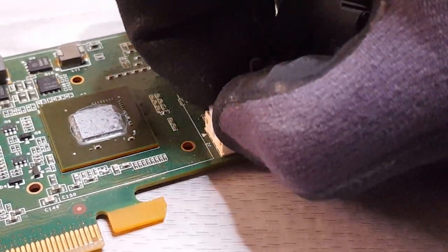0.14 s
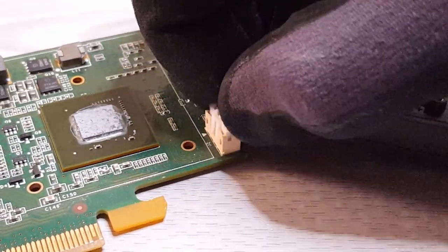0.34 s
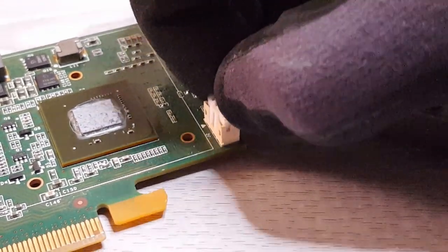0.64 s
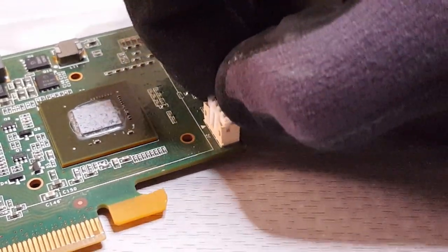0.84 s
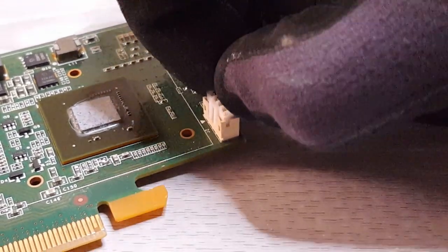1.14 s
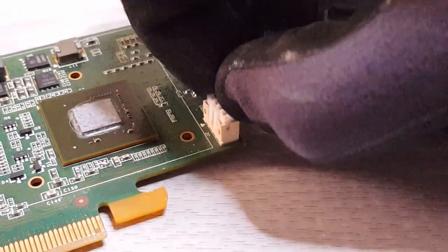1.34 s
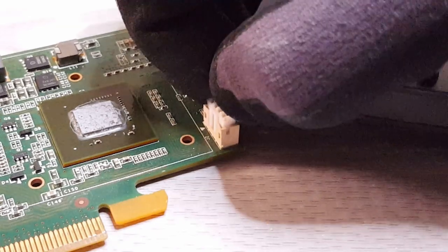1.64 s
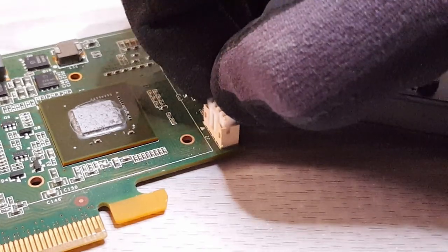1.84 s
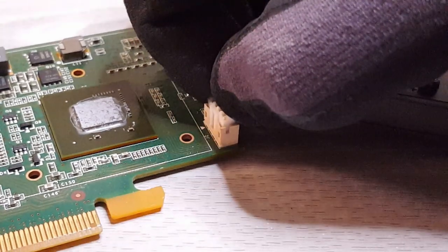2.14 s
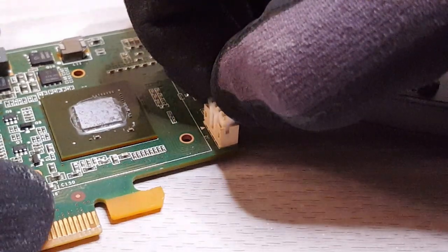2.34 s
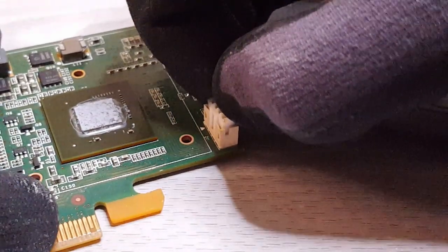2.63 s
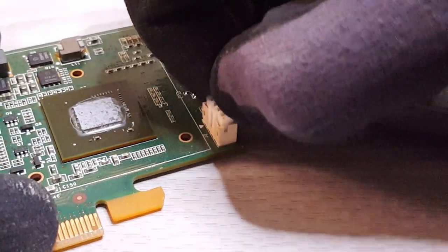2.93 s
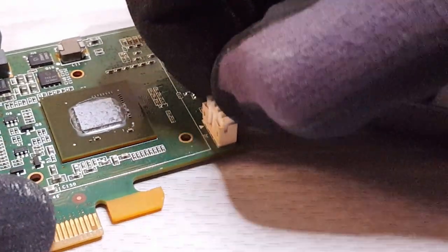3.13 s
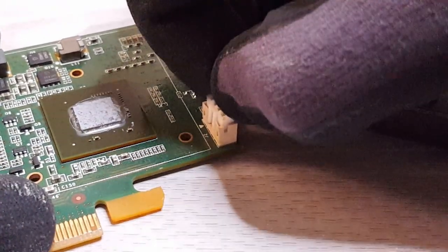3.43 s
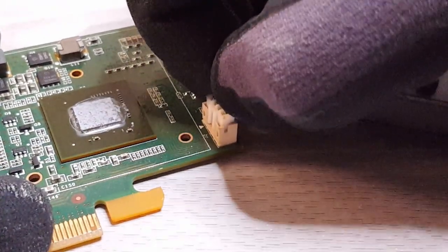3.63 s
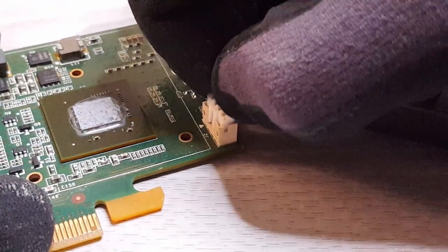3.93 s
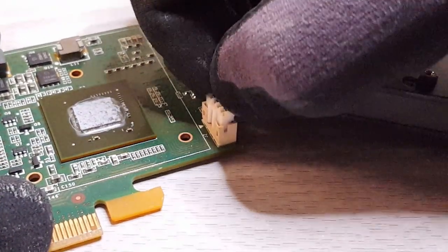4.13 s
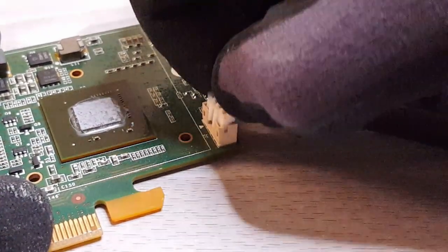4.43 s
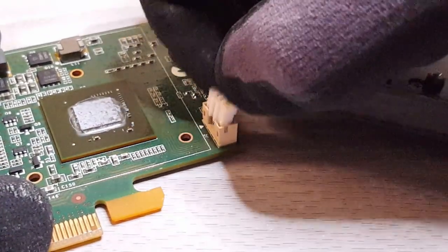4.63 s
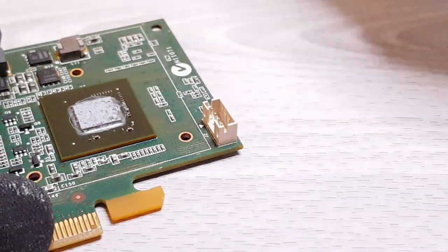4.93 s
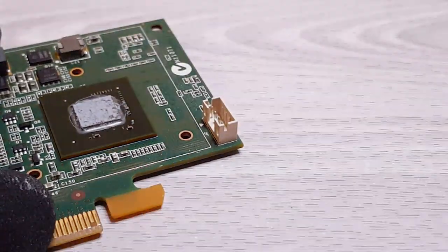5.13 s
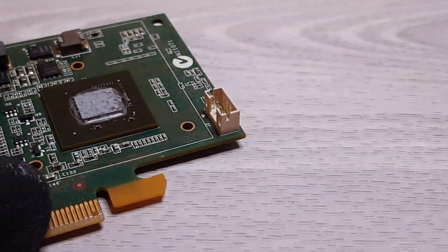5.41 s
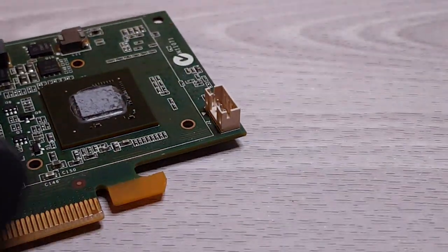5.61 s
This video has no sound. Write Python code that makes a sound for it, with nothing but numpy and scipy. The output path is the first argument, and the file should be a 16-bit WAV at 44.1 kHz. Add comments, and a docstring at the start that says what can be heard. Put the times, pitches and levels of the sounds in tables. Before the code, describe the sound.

In a small quiet room, close stereo microphones catch gloved fingers working a tight plug on a circuit card: uneven hard plastic clicks, light ticks, dull taps and gritty rubbing with faint high metallic singing. Near the end the freed cooler skips, scrapes briefly across the wooden table and lands with a small hollow knock.

```python
"""Freeing a cooler from a graphics card

In a small quiet room, gloved fingers rock a fan plug out of a card lying on a wooden table.
The stereo microphones hear plug clicks as damped modes and noise bursts, and rubbing as clumpy noise
through resonances of the plastic housing and the singing metal fins.
The freed cooler is dragged away as pressure-driven friction and lands on ringing table modes."""
import sys
import numpy as np
from scipy import signal
from scipy.fft import rfft, irfft, next_fast_len
from scipy.io import wavfile
from scipy.ndimage import map_coordinates

SR = 44100
rng = np.random.default_rng(int(sys.argv[2]) if len(sys.argv) > 2 else 0)


def output_pcm(signal):
    """Save a mono or channel-first signal as 16-bit PCM at the path in sys.argv[1].

    Samples are clipped to [-1, 1] before scaling.
    """
    pcm = np.clip(np.atleast_2d(signal).T, -1, 1) * 32767
    wavfile.write(sys.argv[1], SR, np.round(pcm).astype(np.int16))


N = 254456  # samples


def amp(db):
    """Decibels to gain."""
    return 10 ** (np.asarray(db) / 20)


def unit(x):
    """Scale to rms 1."""
    return x / np.sqrt(np.mean(x ** 2) + 1e-20)


def along(points, hz):
    """Interpolate (frequency, value) points on a logarithmic frequency axis."""
    f, value = np.transpose(points)
    return np.interp(np.log(hz + 1), np.log(f + 1), value)


def fade(t, t60):
    """Exponential decay by 60 dB in t60 seconds."""
    return np.exp(-np.log(1000) * t / t60)


def swell(s, half):
    """A bell-shaped stroke centred on s."""
    return np.exp(-((np.arange(N) / SR - s) / half) ** 2 / 2)


def wobble(rate):
    """A smooth random curve with rate knots a second."""
    knots = rng.standard_normal(int(N * rate / SR) + 4)
    return map_coordinates(knots, [np.arange(N) * rate / SR])


def level_curve(rows):
    """Gain per sample from (time, level) rows; practically silent outside them."""
    s, db = np.transpose(rows)
    return amp(np.interp(np.arange(N) / SR, s, db, left=-120, right=-120))


def filtered(x, response):
    """x times a response of frequency, zero-padded against wrap-around."""
    n = x.shape[-1]
    m = next_fast_len(n + SR // 4)
    hz = np.fft.rfftfreq(m, 1 / SR)
    return irfft(rfft(x, m) * response(hz), m)[..., :n]


def coloured(x, spectrum):
    """x weighted by the given spectrum, at rms 1."""
    return unit(filtered(x, lambda hz: amp(along(spectrum, hz))))


def resonate(x, peaks):
    """x through a set of steep-sided resonances added together."""
    def response(f):
        return sum(amp(db) * (f * width) ** 2 / ((centre ** 2 - f ** 2) ** 2 + (f * width) ** 2)
                   for centre, width, db in peaks)
    return filtered(x, response)


# likeness of noise at the left and right microphones: (frequency [Hz], correlation [0-1])
LIKENESS = [(60, 0.87), (290, 0.7), (640, 0.4), (1400, 0.014), (15000, 0.021)]


def noise(size):
    """White noise at two microphones, alike in the bass and nearly unrelated in the treble."""
    def mid_side_gains(hz):
        angle = np.arccos(np.clip(along(LIKENESS, hz), -1, 1)) / 2
        return np.array([np.cos(angle), np.sin(angle)])
    mid, side = filtered(rng.standard_normal((2, size)), mid_side_gains)
    return np.array([mid + side, mid - side])


def friction(rough_db, rate):
    """Tiny slips: noise whose level clumps at random, rate knots a second."""
    return noise(N) * amp(rough_db * wobble(rate))


def burst(spectrum, t, t60):
    """A dense cluster of quickly damped vibrations, as decaying coloured noise."""
    return coloured(noise(len(t)), spectrum) * fade(t, t60)


# uneven radiation towards the two microphones: (frequency [Hz], lead of the left [rad])
LEFT_LEAD = [(150, 0.5), (500, 0), (1200, 1.6), (1880, 1.5), (2220, -0.5), (2730, -4), (3000, -5),
             (3450, -11.5), (4400, -18), (11000, -6)]


def ring(modes, t, scatter_db, detune):
    """One blow on damped modes of alternating sign, as the two microphones hear it."""
    hz, db, t60 = np.transpose(modes)[..., None]
    size, shift = rng.standard_normal((2, len(modes), 1))
    sign = (-1) ** np.arange(len(modes))[:, None]
    lead = along(LEFT_LEAD, hz) / 2
    phase = 2 * np.pi * hz * (1 + detune * shift) * t
    waves = sign * np.sin(phase + np.array([lead, -lead]))
    blow = np.sum(amp(db + scatter_db * size) * fade(t, t60) * waves, axis=1)
    return blow * (1 - np.exp(-t / .0002))  # soften the onset


def sing(peaks, wander_db, count=4):
    """Rubbed fins: as the contact moves, groups of modes swell and sink on their own."""
    drive = friction(rough_db=3.0, rate=270)
    groups = 0
    for k in range(count):
        wander = amp(wander_db * np.tanh(wobble(20)))
        groups = groups + wander * resonate(drive, peaks[k::count])
    return unit(groups)


def panned(x, pan_db):
    """Set the left-right level difference; positive leans left."""
    return x * amp([[pan_db / 2], [-pan_db / 2]])


def add(track, s, x):
    """Mix x into the track at time s."""
    part = track[:, round(s * SR):][:, :x.shape[1]]
    part += x[:, :part.shape[1]]


# decay of the small room: (frequency [Hz], time to fall 60 dB [s])
ROOM_DECAY = [(120, 0.81), (500, 0.51), (2500, 0.27), (6000, 0.21), (14000, 0.18)]


def in_room(x, wet_db):
    """x with quick reflections from table and hands, and the room's short tail."""
    size = SR // 3
    t = np.arange(size) / SR
    hz, frames, z = signal.stft(noise(size), SR, nperseg=256)
    decaying = z * fade(frames, along(ROOM_DECAY, hz)[:, None])
    tail = signal.istft(decaying, SR, nperseg=256)[1][:, :size]
    tail = tail * (1 - np.exp(-t / 0.0014))
    near = noise(size) * fade(t, 0.034) * (t > .0007)
    answer = 1.22 * near / np.linalg.norm(near[0]) + tail / np.linalg.norm(tail[0])
    return x + amp(wet_db) * signal.fftconvolve(x, answer, axes=1)[:, :x.shape[1]]


# hush of the small room: (frequency [Hz], spectral level [dB])
ROOM_HUSH = [(12, -47.5), (20, 3.5), (154, -5), (513, -15.5), (574, -15.5), (660, -15), (949, -19),
             (1480, -17), (2020, -20.5), (2260, -20.5), (2670, -22.5), (3950, -26), (5530, -29),
             (6540, -31), (16000, -31)]


def room_tone():
    """Low rumble and thin hiss: coloured noise at a slightly unsteady level."""
    return amp(-62.5 + 0.13 * wobble(7.6)) * coloured(noise(N), ROOM_HUSH)


# a glove brushing past the card: (centre time [s], half length [s], level [dB])
GLOVE_STROKES = [(2.103, 0.093, -59), (2.357, 0.026, -64.5)]
# knit fabric: (frequency [Hz], spectral level [dB])
FABRIC = [(59, -29), (100, -5), (312, -11.5), (360, -3), (713, -17.5), (774, -14), (1960, -18), (3090, -12),
          (4050, -23.5), (4880, -22.5), (9000, -26), (14000, -30)]


def brushing():
    """Knit fabric brushes softly past the card as swells of clumpy friction noise."""
    level = sum(amp(db) * swell(s, half) for s, half, db in GLOVE_STROKES)
    return level * coloured(friction(rough_db=2.5, rate=290), FABRIC)


def creaks():
    """Faint stray scuffs of gripped plastic: short noise bursts at random times."""
    out = np.zeros((2, N))
    t = np.arange(SR // 8) / SR
    scuff_spectrum = [(200, 2), (1200, -4), (2500, -11), (6000, -16.0), (16000, -16)]
    for when, strength in rng.random(size=(36, 2)):
        scuff = burst(scuff_spectrum, t, t60=0.026)
        add(out, 4.7 * when, amp(-68.5 + 7 * strength) * in_room(scuff, wet_db=-0.5))
    return out


# plastic fan housing: (mode frequency [Hz], relative level [dB], time to fall 60 dB [s])
HOUSING_MODES = [(1320, -50, 0.038), (1856, -23.5, 0.075), (2168, -13.5, 0.039), (2690, -6, 0.024),
                 (2964, 0, 0.011), (3330, -15.5, 0.025), (4280, -17.5, 0.011), (5250, -50, 0.012),
                 (8670, -37, 0.04), (10700, -44, 0.032)]
# card on the table: (mode frequency [Hz], relative level [dB], time to fall 60 dB [s])
BOARD_MODES = [(63, -15, 0.038), (93, -4.5, 0.2), (149, 0, 0.14), (249.6, -6, 0.088), (320, -6, 0.1),
               (462, -4.5, 0.027)]
# dense vibration of the struck shell: (frequency [Hz], spectral level [dB])
SHELL_BURST = [(500, -8.5), (1800, -22), (2900, 3), (3800, -18), (5500, -8), (7000, -34), (16000, -77)]
# sharp snap of the contact: (frequency [Hz], spectral level [dB])
SNAP_BURST = [(300, -6), (2000, -7), (3000, 2), (5000, 7.5), (6800, -1), (8800, 2.5), (11500, -4),
              (16000, -7)]
# hollow clack of the housing: (frequency [Hz], spectral level [dB])
CLACK_BURST = [(200, -33), (600, -1), (1300, -1), (2100, 2.5), (3500, -10.5), (8000, -21)]


def contact(db, knock_db, clack_db, snap_db, pan_db):
    """One contact snaps, rings the plastic housing and knocks the board against the table."""
    t = np.arange(SR // 5) / SR
    plastic = amp(-9.0) * ring(HOUSING_MODES, t, scatter_db=2.0, detune=0.011)
    shell = amp(-9.0) * burst(SHELL_BURST, t, t60=0.0072)
    snap = amp(snap_db + 6) * burst(SNAP_BURST, t, t60=0.003)
    clack = amp(clack_db) * burst(CLACK_BURST, t, t60=0.041)
    knock = amp(knock_db - 5.5) * ring(BOARD_MODES, t, scatter_db=1.0, detune=0.016)
    blow = panned(plastic + shell + snap, pan_db) + clack + knock
    return amp(db) * in_room(blow, wet_db=-13.5)


def gripping(count=5):
    """A short uneven run of tiny contacts as the fingers take hold."""
    out = np.zeros((2, N))
    start_s, gap_s = .035, .052
    for k, (late, strength) in enumerate(rng.uniform(-0.87, 1, size=(count, 2))):
        tick = contact(-56.5 + 2 * strength, knock_db=0, clack_db=-3.0, snap_db=-6, pan_db=7)
        add(out, abs(start_s + gap_s * (k + .15 * late)), tick)
    return out


# the cooler lands: (time [s], relative thud level [dB], crack level [dB])
LANDING_BLOWS = [(5.617, -30, -30.5), (5.6281, -18.5, -31), (5.6335, -25, -22), (5.637, -22, -27.5),
                 (5.666, -37, -34), (5.6689, -28.5, -32)]
# wooden table top: (mode frequency [Hz], relative level [dB], time to fall 60 dB [s])
TABLE_MODES = [(91.5, -9, 0.14), (150.8, -13.5, 0.41), (231, -5, 0.12), (270, -4, 0.12), (313, -10.5, 0.2),
               (390.4, -8, 0.17), (425, -7, 0.15), (518, 2.5, 0.083), (670, -17.5, 0.062), (765, -8, 0.085),
               (892, -14, .12), (1130, -10.5, 0.12), (1207, -9, 0.13), (1880, -17, 0.12), (2140, -26, 0.16),
               (2163, -11, 0.12), (2530, -10, 0.08)]
# dull thump: (frequency [Hz], spectral level [dB])
THUMP_BURST = [(35, -35), (80, -13), (200, -2), (330, -1.5), (500, 1.5), (850, -6), (1200, -10),
               (1700, -34), (6000, -51)]
# bright crack of the impact: (frequency [Hz], spectral level [dB])
CRACK_BURST = [(200, -6), (900, -1), (3000, 1), (4300, -3.5), (6500, 0), (7800, -7), (11000, -6.5),
               (16000, -18)]


def landing():
    """One corner touches, the cooler falls flat and rocks once; the table modes boom."""
    out = np.zeros((2, N))
    t = np.arange(SR // 3) / SR
    for s, thud_db, crack_db in LANDING_BLOWS:
        boom = amp(thud_db - 9.5) * ring(TABLE_MODES, t, scatter_db=3.5, detune=0.014)
        thump = amp(thud_db - 2) * burst(THUMP_BURST, t, t60=0.029)
        crack = amp(crack_db) * burst(CRACK_BURST, t, t60=0.024)
        add(out, s, in_room(boom + thump + panned(crack, pan_db=-1.5), wet_db=-9.5))
    return out


# level around which fin ring and scrape grow with force [dB]
FIRM_DB = -57.5
# fins singing in a pull: (centre [Hz], width [Hz], relative level [dB])
PULLED_FINS = [(7100, 300, -7), (8380, 150, -11), (9380, 390, -3.5), (9960, 280, -7), (12500, 370, 1),
               (13200, 390, -27)]
# the cooler sliding over the table: (time [s], pressure level [dB])
SLIDE_PRESSURE = [(4.93, -71), (4.94, -50), (4.98, -49), (5.04, -57), (5.08, -45.5), (5.13, -51),
                  (5.235, -66), (5.39, -75), (5.45, -67), (5.52, -82)]
# its edge skipping before the slide: (time [s], level [dB])
EDGE_SKIPS = [(4.877, -49), (4.89, -52), (4.918, -44.5), (4.9382, -46.5)]
# drag over wood: (frequency [Hz], spectral level [dB])
DRAG_SPECTRUM = [(47, -45), (80, -16), (139, 2.5), (182, -9.5), (265, -1), (515, -3), (615, -9.5),
                 (1200, -16.5), (1310, -17), (2130, -10), (5640, -13.5), (7700, -14.5), (11000, -14.5),
                 (13700, -24), (16000, -35)]
# fins singing in the slide: (centre [Hz], width [Hz], relative level [dB])
SLIDING_FINS = [(5360, 1200, -1), (8260, 310, -2), (9340, 650, 1), (10550, 780, -2.5), (11260, 450, -3),
                (13300, 400, 0)]


def sliding():
    """The cooler skips, then is dragged away in two pulls; friction excites its singing fins."""
    pressure = level_curve(SLIDE_PRESSURE)
    skips = sum(amp(db) * swell(s, half=0.0032) for s, db in EDGE_SKIPS)
    catch = amp(0.91 * wobble(70))  # the edge catches and runs free
    drag = (pressure + skips) * coloured(friction(rough_db=2, rate=480), DRAG_SPECTRUM)
    # the fins grow more slowly than the pressure
    fin_level = amp(FIRM_DB - 1.5) * (pressure / amp(FIRM_DB)) ** 0.88
    fins = fin_level * sing(SLIDING_FINS, wander_db=4.0)
    chirps = amp(-2) * skips * sing(PULLED_FINS + SLIDING_FINS, wander_db=-1.0)
    moving = panned(drag, pan_db=-2.5) + panned(fins + chirps, pan_db=-3.0)
    return in_room(catch * moving, wet_db=-11)


# rubbing strokes: (centre time [s], half length [s], force level [dB], share of pull against push [0-1])
RUBS = [(0.368, 0.021, -55.5, 1), (0.473, 0.006, -66.5, 1), (0.618, 0.043, -68.5, 1),
        (0.693, 0.0049, -49.5, 0.01), (0.848, 0.029, -65.5, 0.3), (0.907, 0.015, -57, 0.2),
        (0.986, 0.022, -70, 0.9), (1.061, 0.0085, -61, 0.2), (1.224, 0.025, -64, 0.05),
        (1.383, 0.017, -56.5, 0.55), (1.42, 0.017, -51, 0.1), (1.454, 0.01, -47, 0.4),
        (2.963, 0.019, -72, 0.9), (3.346, 0.018, -56.5, 0.94), (3.612, 0.015, -62.5, 0.1),
        (3.805, 0.02, -61, 0.9), (4.087, 0.02, -61, 0.05), (4.28, 0.033, -57.5, 0.9),
        (4.467, 0.027, -65, 0.5), (4.702, 0.013, -56.5, 0.9), (4.777, 0.016, -68.5, 1),
        (4.869, 0.023, -57.5, 0.7)]
# rubbed housing and heat sink: (centre [Hz], width [Hz], relative level [dB])
RUBBED_SHELL = [(308, 450, -3), (2120, 430, -2), (2770, 440, 3.5), (3390, 640, -9.5), (4320, 1000, -10.5),
                (5680, 890, -11.5)]
# gritty scrape: (frequency [Hz], spectral level [dB])
GRIT_SPECTRUM = [(60, -15), (250, 4.5), (700, -7.5), (1600, -8), (3000, -15), (3800, -21), (7000, -19),
                 (12000, -18), (16000, -32)]
# fins singing in a push: (centre [Hz], width [Hz], relative level [dB])
PUSHED_FINS = [(5270, 290, -9), (8240, 170, -0.5), (8970, 240, -6), (9560, 320, -14), (10260, 200, 1.5),
               (10780, 280, -6.5), (11530, 100, 3.5), (12300, 350, -13), (13350, 420, -4)]


def rubbing():
    """Strokes scrape the housing; pull, push and each spring-back wake different fin modes."""
    scrape = 0
    for s, half, db, _ in RUBS:
        # the scrape grows faster than the force
        scrape = scrape + amp(FIRM_DB + 2 + 1.42 * (db - FIRM_DB)) * swell(s, half)
    # the cooler springs back 0.04 s after each click of the plug
    rebounds = [(s + 0.04, 0.014, -69.5, share) for s, *_, share in PLUG_CLICKS]
    pull, push = np.zeros((2, N))
    for s, half, db, share in RUBS + rebounds:
        stroke = amp(db) * swell(s, half)
        share = np.clip(share, 0, 1)
        pull += np.sqrt(share) * stroke
        push += np.sqrt(1 - share) * stroke
    shell = amp(-1.5) * unit(resonate(friction(rough_db=4.0, rate=400), RUBBED_SHELL))
    grit = amp(-5.5) * coloured(friction(rough_db=7.0, rate=1100), GRIT_SPECTRUM)
    fins = pull * sing(PULLED_FINS, wander_db=-3.0) + push * sing(PUSHED_FINS, wander_db=10.0)
    scraping = scrape * (panned(shell, pan_db=-7) + panned(grit, pan_db=-0.5))
    return in_room(scraping + amp(-3.5) * fins, wet_db=-14.0)


# the plug jumps in its socket: (time [s], level [dB], relative knock on the table [dB],
# relative snap [dB], left-right difference [dB], share of pull in the spring-back [0-1])
PLUG_CLICKS = [(0.2666, -32, -28, -14, -5, .3), (0.6863, -29, -18, -33, 2, 0),
               (0.7854, -20.5, -20, -53, -7.5, 0), (1.4379, -32, -24, -21, -17, .5),
               (1.4501, -28.5, -11.5, -10, 2, 1), (1.7455, -21.5, -13, -12, -5.5, 1),
               (1.7838, -31.5, -13, -16, -8, .7), (2.588, -40, -35, -28, -3, 1),
               (3.0088, -32.5, -16, -21, -6.5, 0.3), (3.1645, -34, -17, -17, -7, 1),
               (3.413, -31.5, -16.5, -23, -6, 0), (3.6411, -30.5, -16.5, -13.5, -4, 0.9),
               (3.844, -34, -15.5, -24, -9, 0), (4.0879, -32, -12, -13, -1, 1),
               (4.3051, -24.5, -17.5, -18, -8.5, .1), (4.5493, -26.5, -16.5, -12, -0.5, 1),
               (4.7002, -26, -23.5, -16, 0, 1)]
# light ticks of plastic edges: (time [s], level [dB], relative snap [dB], left-right difference [dB])
EDGE_TICKS = [(0.2078, -44.5, -7.5, 3), (0.974, -49, 0, -3), (1.0191, -42, -4.5, 14), (1.052, -45, -1, -4),
              (1.1024, -39.5, -18.5, 9.5), (4.7185, -45.5, 5.5, 13)]
# dull taps of the housing: (time [s], level [dB])
HOUSING_TAPS = [(0.1225, -53), (0.3459, -47), (1.181, -47.5), (2.0844, -47), (2.6007, -47.5), (2.701, -59),
                (2.9185, -51.5), (4.1593, -50), (4.2228, -52.5), (4.6443, -49), (5.5341, -40),
                (5.5397, -46), (5.5603, -37)]


def clicks():
    """Plug clicks, bright ticks and dull taps: one contact model, with different snap and knock."""
    out = np.zeros((2, N))
    for s, db, knock_db, snap_db, pan_db, _ in PLUG_CLICKS:
        add(out, s, contact(db, knock_db, clack_db=-23, snap_db=snap_db, pan_db=pan_db))
    for s, db, snap_db, pan_db in EDGE_TICKS:
        add(out, s, contact(db, knock_db=-19, clack_db=-17, snap_db=snap_db, pan_db=pan_db))
    for s, db in HOUSING_TAPS:
        add(out, s, contact(db, knock_db=-26, clack_db=-5, snap_db=-16.5, pan_db=-5.0))
    return out


def scene():
    """All sources at the two microphones, from the room to the plug."""
    background = room_tone() + brushing() + creaks() + gripping()
    return background + landing() + sliding() + rubbing() + clicks()


def record(dry):
    """The microphones shed deep rumble and the recorder keeps almost nothing above its band limit."""
    low_hz, top_hz = 45, 15950
    thinned = filtered(dry, lambda hz: 1j * hz / (low_hz + 1j * hz))
    return filtered(thinned, lambda hz: 1 / np.sqrt(1 + (hz / top_hz) ** 160))


dry = scene()
out = record(dry)
output_pcm(out)
```